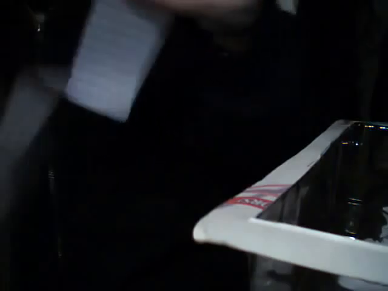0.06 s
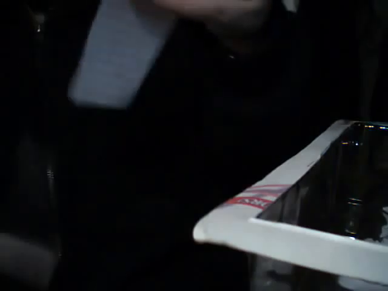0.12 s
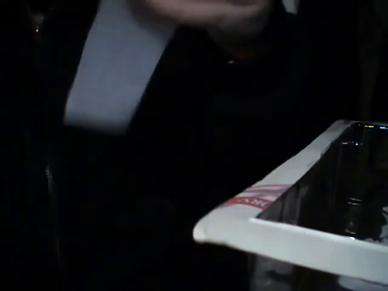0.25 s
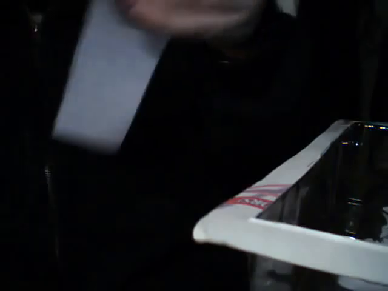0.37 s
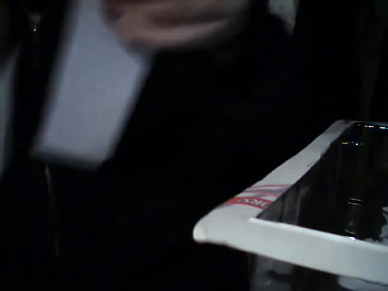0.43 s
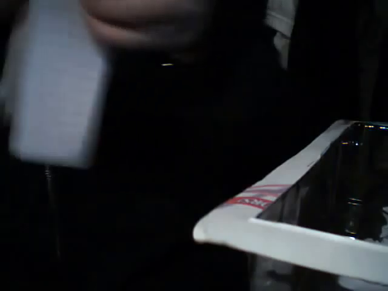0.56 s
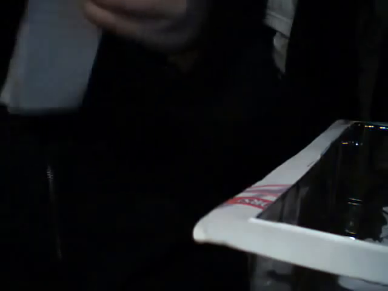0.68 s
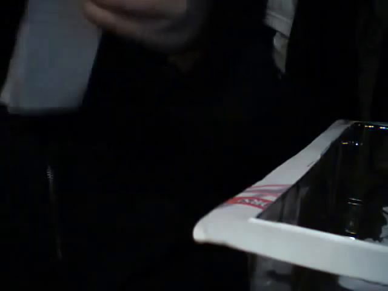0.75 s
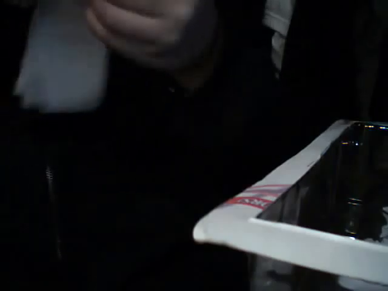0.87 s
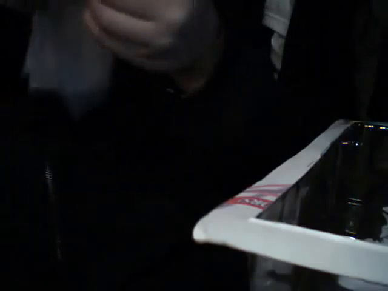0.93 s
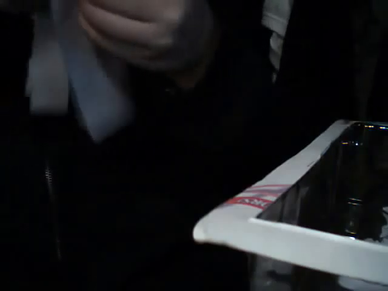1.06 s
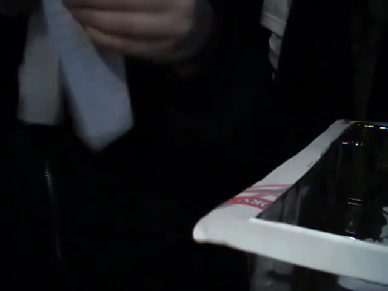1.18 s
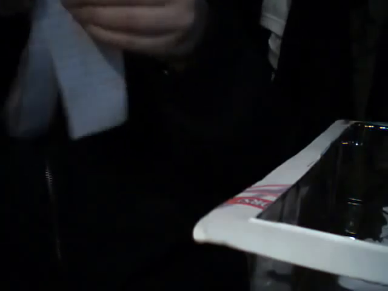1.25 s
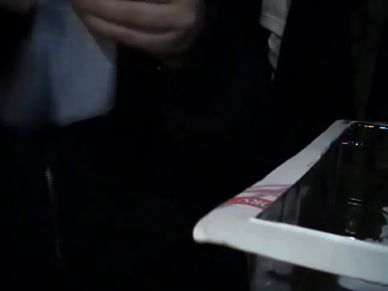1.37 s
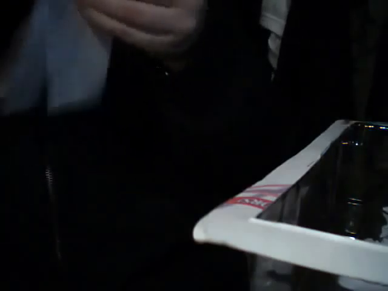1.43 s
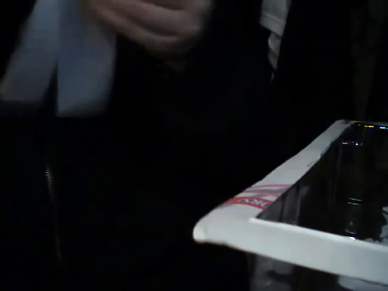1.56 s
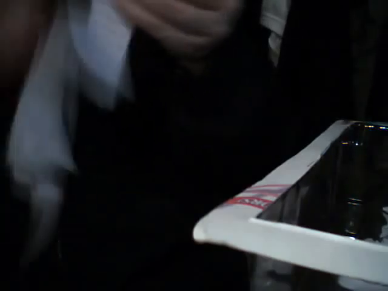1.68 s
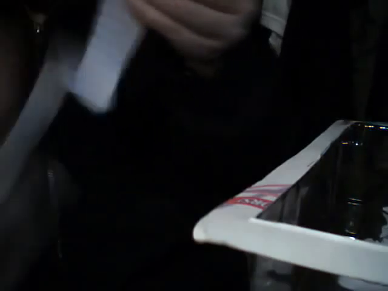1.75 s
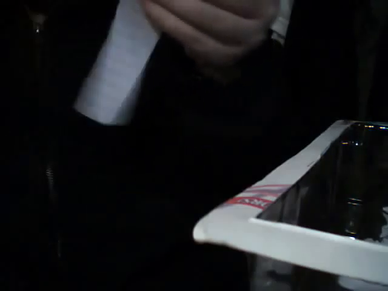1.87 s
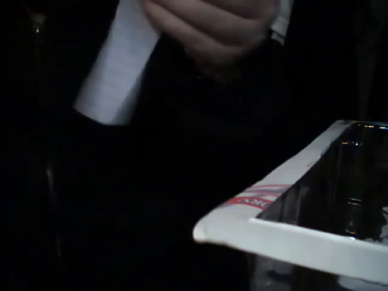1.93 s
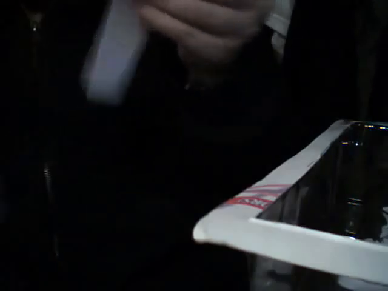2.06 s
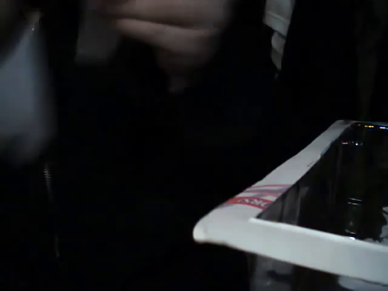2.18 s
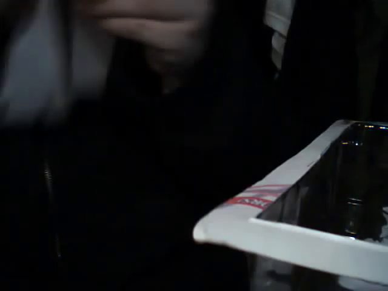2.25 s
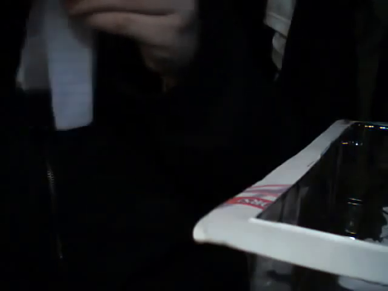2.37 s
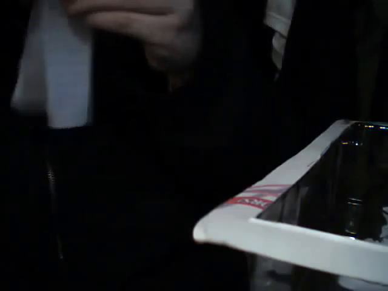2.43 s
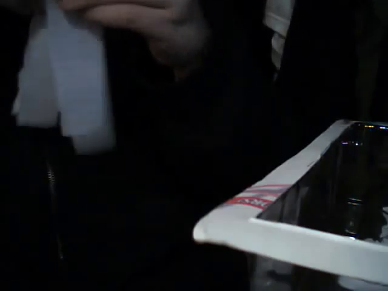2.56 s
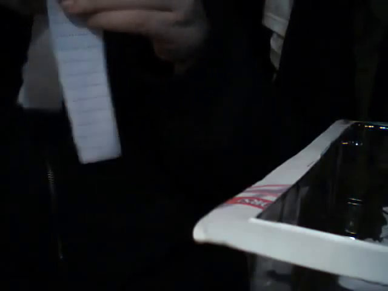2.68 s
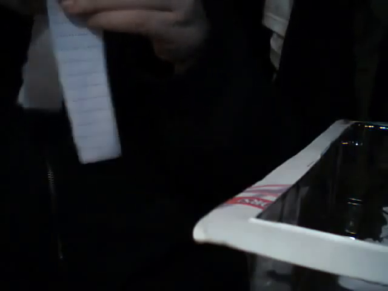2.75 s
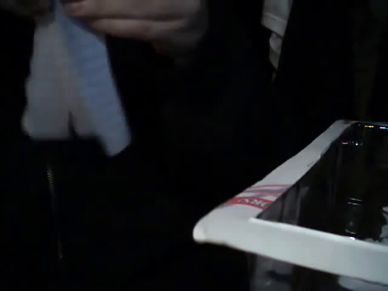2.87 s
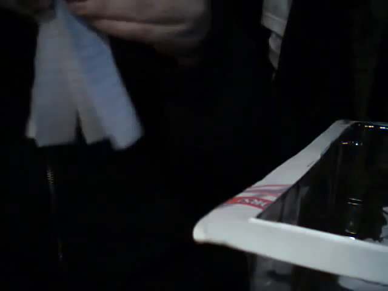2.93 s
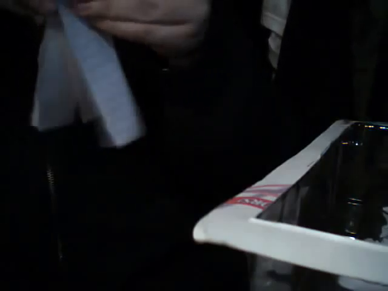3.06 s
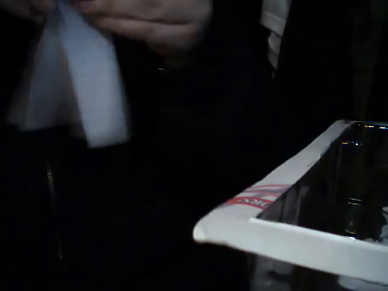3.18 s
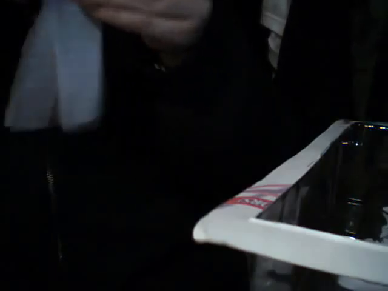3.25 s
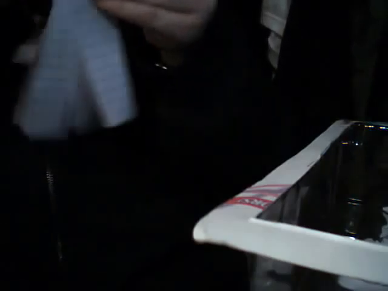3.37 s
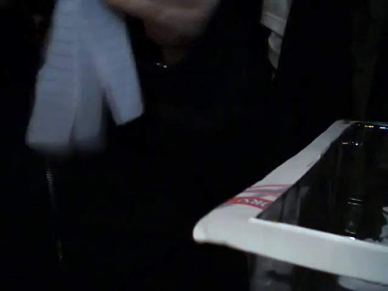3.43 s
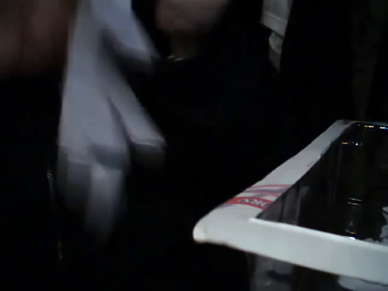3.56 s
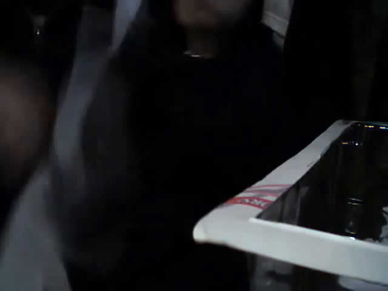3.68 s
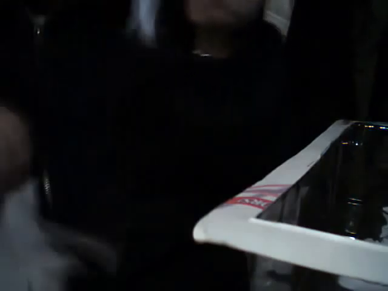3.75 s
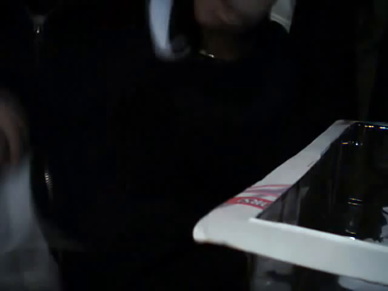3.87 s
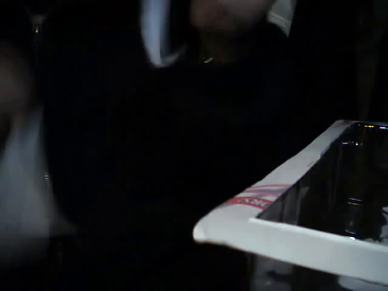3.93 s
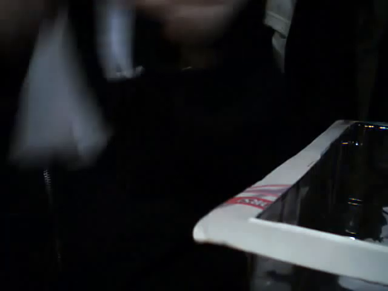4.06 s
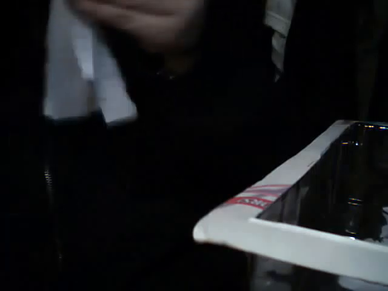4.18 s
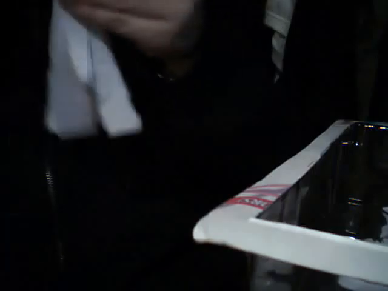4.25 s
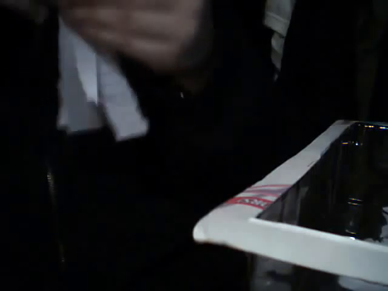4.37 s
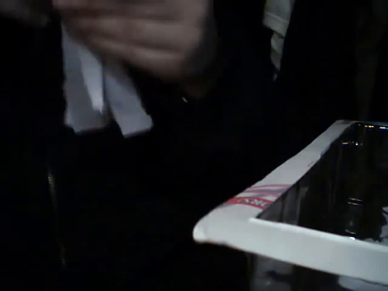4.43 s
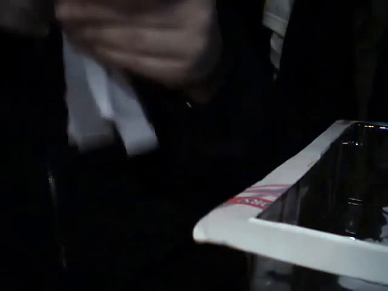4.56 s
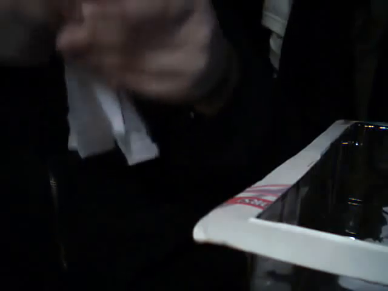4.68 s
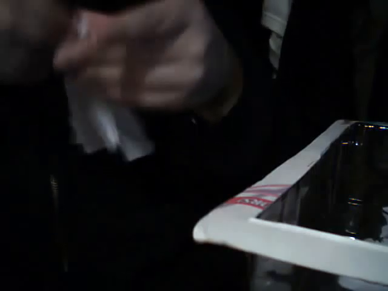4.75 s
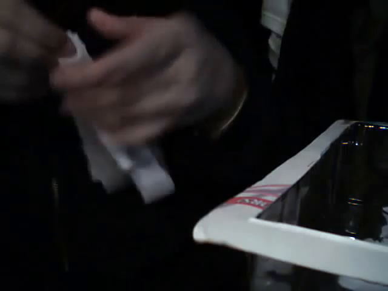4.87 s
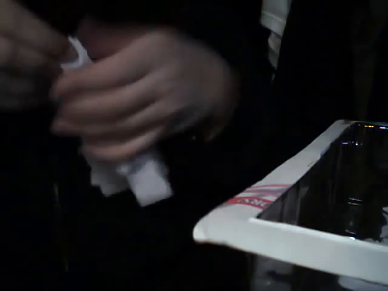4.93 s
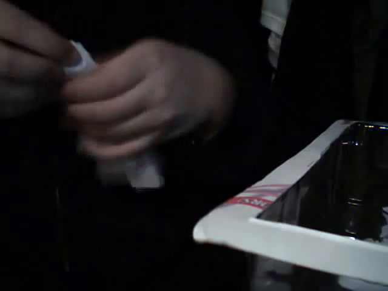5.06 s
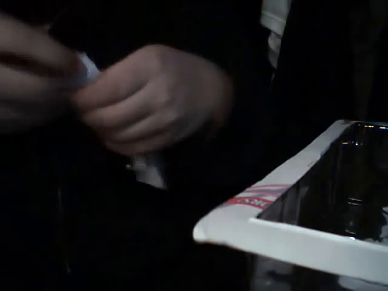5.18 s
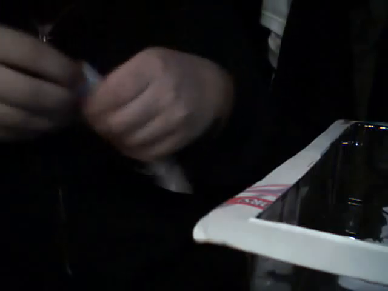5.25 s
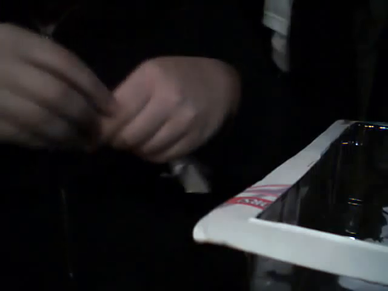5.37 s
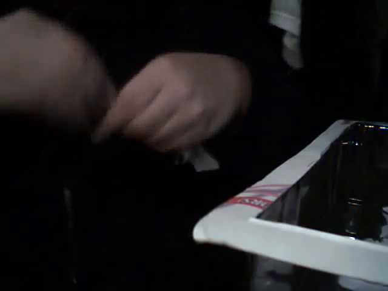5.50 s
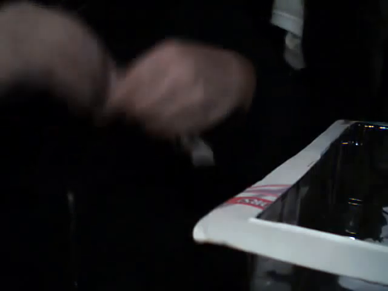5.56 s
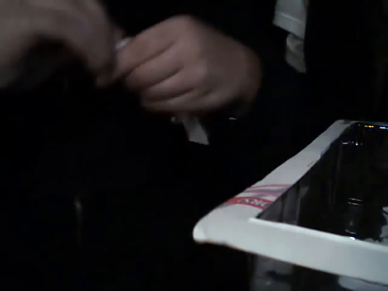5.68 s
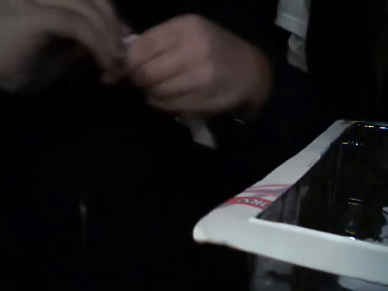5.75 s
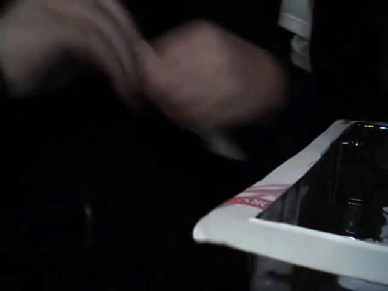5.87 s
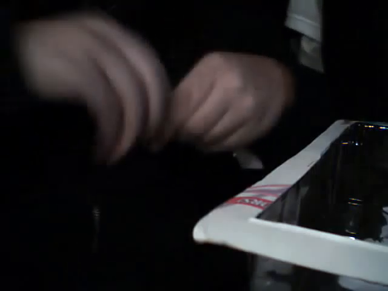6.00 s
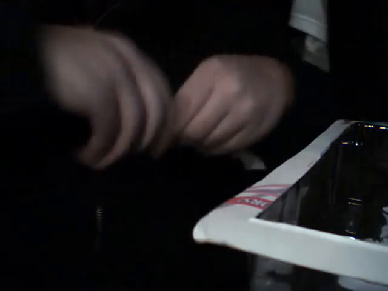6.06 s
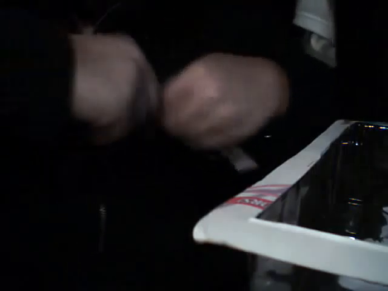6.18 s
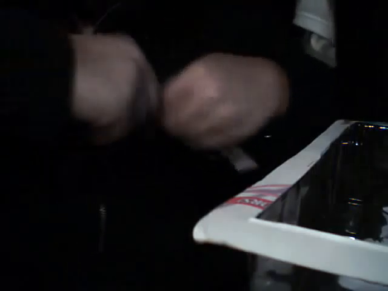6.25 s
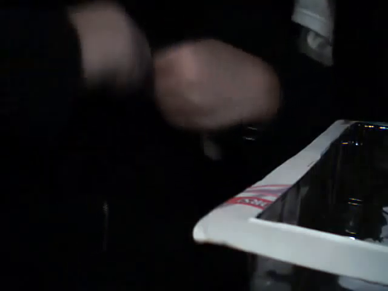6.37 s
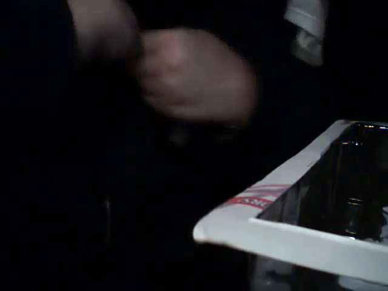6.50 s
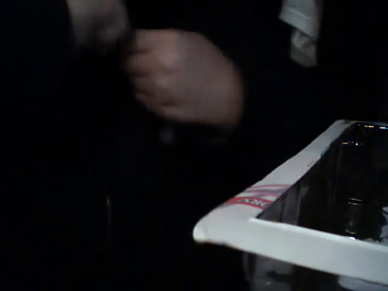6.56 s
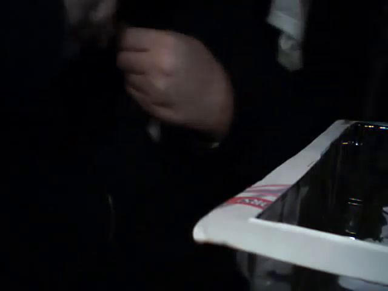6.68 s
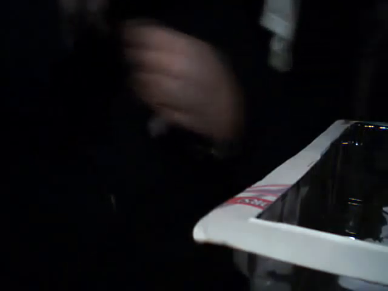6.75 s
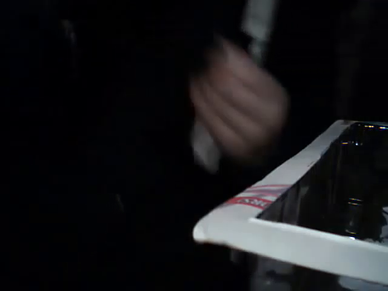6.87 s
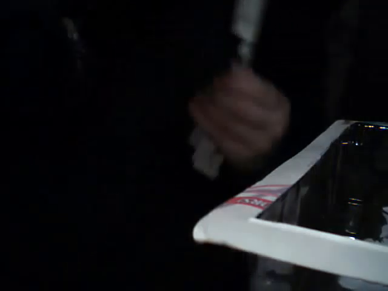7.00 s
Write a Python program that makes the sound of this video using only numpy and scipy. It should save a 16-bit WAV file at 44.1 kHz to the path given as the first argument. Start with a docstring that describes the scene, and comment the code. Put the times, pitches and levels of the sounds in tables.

```python
"""A quiet room, with a small camera's microphone close to a sheet of notepaper.
Three strips are ripped off, each a rush of snapping fibres that shakes the sheet.
Creases pop, the paper knocks softly, and between rips it rustles as the fingers shift their grip.
Behind it all lie a soft hiss and the thin, steady whine of a small motor."""
import sys
import numpy as np
from scipy import signal
from scipy.fft import rfft, irfft
from scipy.io import wavfile

SR = 44100
rng = np.random.default_rng(int(sys.argv[2]) if len(sys.argv) > 2 else 0)


def log_audio(samples):
    """Write samples as a 16-bit WAV file to the path given in sys.argv[1]."""
    # one column per channel
    frames = np.atleast_2d(samples).T
    # limit to full scale, then quantise
    limited = np.clip(frames, -1, 1)
    pcm = np.round(limited * 32767).astype(np.int16)
    wavfile.write(sys.argv[1], SR, pcm)


N = 309582
TIME = np.arange(N) / SR

# Tone of the background hiss. Each row: frequency in Hz, relative level in dB.
HISS_COLOUR = [(25, -5.5), (70, -3), (200, -2), (340, -4), (500, 2.5), (780, 1), (930, -8), (1150, 1.5),
               (1550, 3.5), (2500, -1.5), (2950, -15.5), (3600, -11.5), (5500, -27), (8000, -42.5)]
# Partials of the motor. Each row: frequency in Hz, rms level in dB.
MOTOR_PARTIALS = [(269.2, -72.5), (473.7, -71), (1087, -68), (1292, -58), (1357, -69.5), (1631, -66.5)]
# Strength of the pull, one curve per rip. Each row: time in seconds, relative level in dB.
RIP_PULLS = [
    [(0.0, -20.5), (0.098, -15.5), (0.136, -20.5), (0.17, -15.5), (0.258, -43), (0.275, -75)],
    [(1.6, -59.5), (1.668, -25), (1.814, -19.5), (1.888, -24), (1.908, -30), (1.944, -53), (1.948, -63)],
    [(3.52, -53), (3.552, -37.5), (3.602, -33.5), (3.63, -23.5), (3.668, -22), (3.682, -29), (3.708, -22),
     (3.766, -32.5), (3.835, -63)],
]
# The hand's swing in each rip. Each row: fastest moment in seconds, half width in seconds,
# rattle gain in dB, its fade in dB per second, flutter gain in dB, flap gain in dB.
HAND_SWINGS = [(0.115, 0.18, -2, 34, -12.5, -19), (1.8, 0.065, -6, 5.5, -12, -19.5),
               (3.68, 0.099, -11.5, 4, -20.5, -22.5)]
# Tone of the snapping fibres, the rattling sheet, the strip's flutter and flap, the cracking folds
# and the rubbed paper. Each row: frequency in Hz, relative level in dB.
FIBRE_COLOUR = [(2000, -29.5), (2900, -11), (3200, -11), (3550, -0.5), (4150, -4), (4700, -10.5),
                (5250, 0.5), (5800, 0.5), (6300, -5.5), (6900, -2.5), (7500, -12), (8100, -17.5)]
SHEET_RATTLE_COLOUR = [(600, -30.5), (1050, -4.5), (1420, 3), (1700, -3), (1950, 1), (2300, 1),
                       (2550, -2.5), (2750, -4), (3300, -20)]
STRIP_FLUTTER_COLOUR = [(180, -21.5), (350, -4), (500, 1), (700, 1.5), (950, 0), (1400, -27)]
STRIP_FLAP_COLOUR = [(20, -3), (40, -6), (75, -4.5), (115, -1.5), (170, -2), (260, -0.5), (480, -25)]
FOLD_COLOUR = [(300, -24), (1500, -10.5), (2800, -7.5), (3900, -3), (5200, 0.5), (6200, 0.5), (7200, -6.5),
               (8000, -17)]
RUB_COLOUR = [(500, -4.5), (2000, -4.5), (3700, 1), (4600, -3.5), (5400, 4.5), (6800, -5), (8000, -21.5)]
# Creases popping and the tear catching. Each row: start in seconds, crack gain in dB, ring gain in dB.
CREASE_POPS = [(0.0501, -14, -14), (0.076, -15.5, -15.5), (0.1968, -20, -19.5), (1.14, -45.5, -44),
               (1.5185, -47, -47), (1.6506, -18.5, -29), (1.8913, -16.5, -22), (3.1812, -39.5, -45),
               (3.203, -49, -55), (3.3298, -27.5, -41), (3.3377, -18, -48), (3.346, -26, -48),
               (3.3566, -20.5, -21.5), (3.501, -36, -46), (3.5526, -25.5, -35), (3.5623, -39, -50),
               (3.7647, -15, -40), (3.7964, -32, -41.5), (4.4694, -59, -56), (4.7138, -39, -34.5),
               (4.722, -44.5, -50.5), (6.3989, -44, -45), (6.553, -48, -58), (6.8358, -44, -44)]
# Ring of the taut sheet. Each row: frequency in Hz, relative level in dB, seconds to fall by 60 dB.
TAUT_SHEET_MODES = [(1227.6, -9.5, .02), (1470, -3.5, 0.02), (1850, 3, 0.02), (2099, -4, .018),
                    (2620, -12.5, 0.017)]
# Fingers sliding over the paper.
# Each row: peak time in seconds, relative level in dB, rise in seconds, fall in seconds.
FINGER_STROKES = [(0.45, -68.5, 0.03, 0.04), (1.0, -70, 0.08, 0.069), (1.3, -64, 0.1, 0.05),
                  (1.6, -53, 0.067, 0.041), (1.999, -66, 0.03, 0.05), (2.11, -62, 0.018, 0.05),
                  (2.65, -71, 0.054, 0.06), (2.88, -67, 0.08, 0.06), (3.025, -57.5, 0.031, 0.035),
                  (3.39, -55, 0.015, 0.06), (3.5, -56, 0.06, 0.04), (3.85, -64, 0.03, 0.06),
                  (3.98, -64, 0.048, 0.058), (4.84, -65.5, 0.035, 0.08), (5.135, -61.5, 0.08, 0.035),
                  (5.32, -68.5, 0.058, 0.06), (6.02, -69.5, 0.45, 0.3), (6.57, -64.5, 0.092, 0.12),
                  (6.836, -45, 0.027, 0.026)]
# Soft, low knocks of the paper: fingertip bumps, and two thumps of the flapping strip in the third rip.
# Each row: start in seconds, relative level in dB, pitch in Hz.
PAPER_KNOCKS = [(0.997, -42.5, 393), (1.318, -44, 556), (1.352, -43, 536), (1.753, -17.5, 515),
                (3.182, -37.5, 733), (3.356, -42, 576), (3.541, -39.5, 890), (3.61, -25, 528),
                (3.638, -24.5, 540), (3.671, -27, 124), (3.722, -28, 124), (4.713, -41.5, 800),
                (6.356, -40.5, 572), (6.552, -44, 587)]
# Reflections off the hands and the table. Each row: delay in milliseconds, gain as a factor.
NEAR_ECHOES = [(1.5, 0.1), (1.93, 0.11)]


def undb(db):
    """Decibels to gain."""
    return 10 ** (np.asarray(db) / 20)


def unit(x):
    """Scale to rms 1."""
    return x / np.sqrt(np.mean(x ** 2))


def add(track, s, sound):
    """Mix a sound into the track at s seconds."""
    start = max(int(s * SR), 0)
    track[start:start + len(sound)] += sound[:N - start]


def colour(x, points, size=2048):
    """Minimum-phase filter of unit power gain through (Hz, dB) points."""
    hz, db = np.transpose(points)
    log_bins = np.log1p(np.fft.rfftfreq(size, 1 / SR))
    curve_db = np.interp(log_bins, np.log(hz), db, left=db[0], right=db[-1] - 21.5)
    cepstrum = irfft(np.log(undb(curve_db)))[:size // 2]
    cepstrum[1:] *= 2
    response = irfft(np.exp(rfft(cepstrum, size)))[:size // 2]
    return signal.oaconvolve(x, response / np.linalg.norm(response))[:len(x)]


def wander(per_s):
    """Random drift of rms 1, changing course per_s times a second."""
    steps = rng.standard_normal(N // 20)
    return unit(np.interp(TIME * per_s, np.arange(len(steps)), steps))


def decay(t, t60):
    """Fade that falls by 60 dB in t60 seconds."""
    return np.exp(-np.log(1000) * t / t60)


def ring(hz, t60, size=4096):
    """One fading mode, pushed within half a cycle."""
    t = TIME[:size]
    return np.sin(2 * np.pi * hz * t) * (1 - np.exp(-2 * hz * t)) * decay(t, t60)


def hiss(rms_db=-54.63):
    """A soft, even hiss behind the paper."""
    return undb(rms_db) * colour(rng.standard_normal(N), HISS_COLOUR)


def motor_whine():
    """A small motor whines, wavering slightly in speed and level."""
    speed = 1 + 0.0011 * wander(14)
    run_s = np.cumsum(speed) / SR
    return np.sqrt(2) * sum(undb(db + 0.69 * wander(18)) * np.sin(2 * np.pi * hz * run_s)
                            for hz, db in MOTOR_PARTIALS)


def snaps(per_s, spread_db):
    """Tiny snaps or slips in the paper: random clicks of uneven size, rms 1."""
    happens = rng.random(N) < per_s / SR
    size = undb(spread_db * np.minimum(rng.exponential(size=N), np.pi))
    return unit(happens * size * np.sign(rng.standard_normal(N)))


def buckles(per_s, t60, spread_db, low_hz, high_hz, count=14000):
    """Small patches of the sheet flip over, each ringing briefly at its own pitch."""
    out = np.zeros(N)
    end_s = RIP_PULLS[-1][-1][0]
    gap, pitch, force, side = rng.random((count, 4)).T
    starts = np.cumsum(2 * gap) / per_s
    pitches = low_hz + (high_hz - low_hz) * pitch
    for s, hz, db, way in zip(starts[starts < end_s], pitches, spread_db * force, np.sign(side - .5)):
        add(out, s, way * undb(db) * ring(hz, t60, size=1024))
    return out / np.std(out[TIME < end_s])


def rips(rattle_swell_db=3.5, flutter_swell_db=9.5, flap_swell_db=12):
    """Fibres break close to the microphone; the sheet rattles and the loose strip flutters and flaps,
    swelling as the hand swings fastest."""
    snap = rattle = flutter = flap = 0
    for curve, swing in zip(RIP_PULLS, HAND_SWINGS):
        s, db = np.transpose(curve)
        fastest_s, width_s, rattle_db, fade_db_per_s, flutter_db, flap_db = swing
        pull = undb(np.interp(TIME, np.r_[s[0] - .01, s, s[-1] + .01], np.r_[-120, db, -120]))
        shake = pull ** 0.84  # the shaking grows a little less than the pull
        slowness = 1 - np.exp(-((TIME - fastest_s) / width_s) ** 2)
        torn_s = np.clip(TIME, s[0], s[-1]) - s[0]
        snap += pull
        # the rattle dies down as the tear uses up the taut sheet
        rattle += shake * undb(rattle_db - rattle_swell_db * slowness - fade_db_per_s * torn_s)
        flutter += shake * undb(flutter_db - flutter_swell_db * slowness)
        flap += shake * undb(flap_db - flap_swell_db * slowness)
    # the tear front sticks and runs on, bundle by bundle
    fibres = unit(undb(1.1 * wander(450))) * snaps(per_s=14000, spread_db=0.5)
    buckling = buckles(per_s=1600, t60=.024, spread_db=14, low_hz=250, high_hz=3105)
    sheet = unit(buckling + undb(4.5) * fibres)
    return (undb(-0.2) * snap * colour(fibres, FIBRE_COLOUR)
            + undb(-7.0) * rattle * colour(sheet, SHEET_RATTLE_COLOUR)
            + undb(-5.5) * flutter * colour(sheet, STRIP_FLUTTER_COLOUR)
            + flap * colour(fibres, STRIP_FLAP_COLOUR))


def creases(size=4096):
    """A fold gives way in a quick burst of cracks, then snaps over and sets the sheet ringing."""
    cracks, rings = np.zeros(N), np.zeros(N)
    sheet = sum(undb(db) * ring(hz, t60) for hz, db, t60 in TAUT_SHEET_MODES)
    t = TIME[:size]
    burst = (1 - np.exp(-t / 0.0019)) * decay(t, t60=.03)
    for s, crack_db, ring_db in CREASE_POPS:
        add(cracks, s, undb(crack_db) * burst * rng.standard_normal(size))
        add(rings, s + .0015, undb(ring_db) * sheet)
    return undb(-2.5) * colour(cracks, FOLD_COLOUR) + rings


def finger_rustle():
    """Skin rubs over paper in many tiny slips; each stroke swells and eases off."""
    pressure = np.zeros(N)
    for s, db, rise_s, fall_s in FINGER_STROKES:
        pressure += undb(db) * np.exp(-np.maximum((s - TIME) / rise_s, (TIME - s) / fall_s))
    slips = snaps(per_s=2500, spread_db=1.0) * unit(undb(1.9 * wander(42)))
    return undb(-2.0) * pressure * colour(slips, RUB_COLOUR)


def paper_knocks():
    """The paper gives a low, quickly damped knock as a fingertip bumps it or the strip flaps."""
    out = np.zeros(N)
    for s, db, hz in PAPER_KNOCKS:
        knock = ring(hz, t60=0.026) + 0.39 * ring(1.4 * hz, t60=0.038)
        add(out, s, undb(db) * knock)
    return undb(4.0) * out


def room(x, wet_db, t60, size=16384):
    """Near surfaces answer at once; the furnished room adds a short, weak tail."""
    t = TIME[:size]
    tail = rng.standard_normal(size) * decay(t, t60) * (t > .003)
    response = undb(wet_db) * tail / np.linalg.norm(tail)
    response[0] = 1  # straight path to the microphone
    for ms, gain in NEAR_ECHOES:
        response[round(ms * SR / 1000)] += gain
    return signal.oaconvolve(x, response)[:N]


def scene():
    """The paper at close range, in mono, with hiss and whine behind it."""
    paper = rips() + creases() + finger_rustle() + paper_knocks()
    return (room(paper, wet_db=-11.0, t60=.075) + hiss() + motor_whine())[None]


def record(dry, top_hz=8000):
    """The camera cuts the treble steeply."""
    return signal.sosfilt(signal.ellip(10, .2, 70, top_hz, fs=SR, output="sos"), dry)


dry = scene()
out = record(dry)
log_audio(out)
```